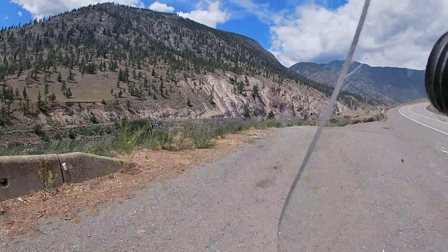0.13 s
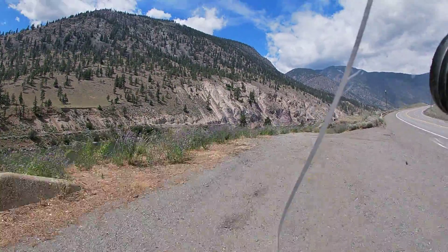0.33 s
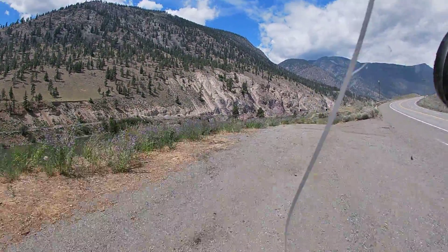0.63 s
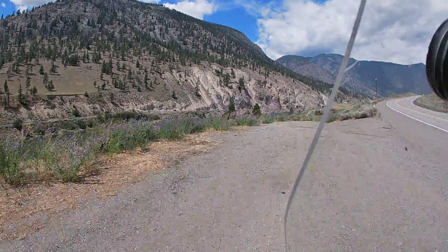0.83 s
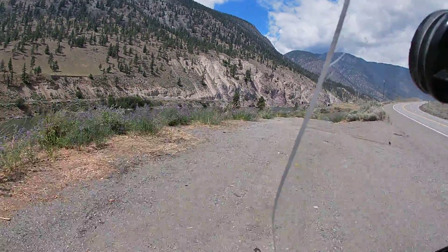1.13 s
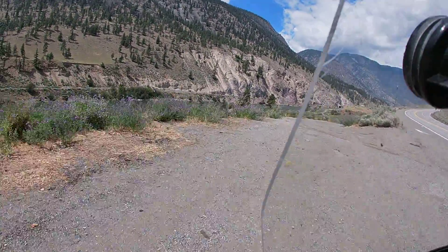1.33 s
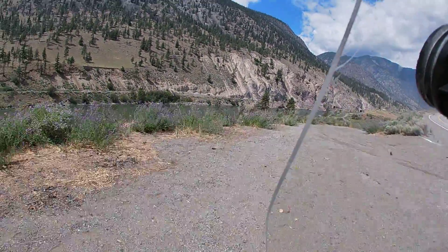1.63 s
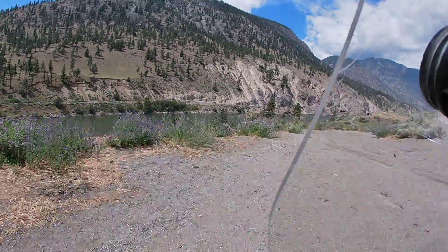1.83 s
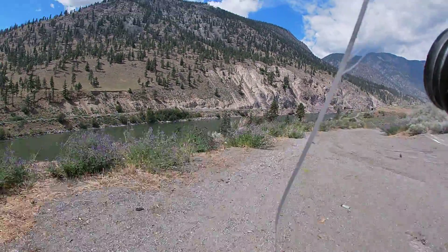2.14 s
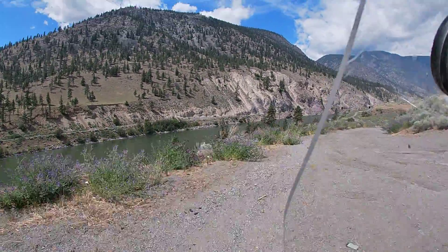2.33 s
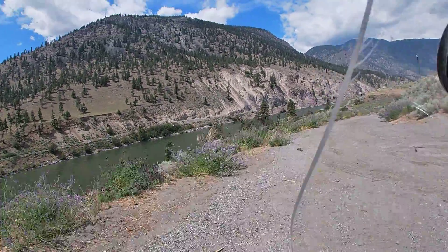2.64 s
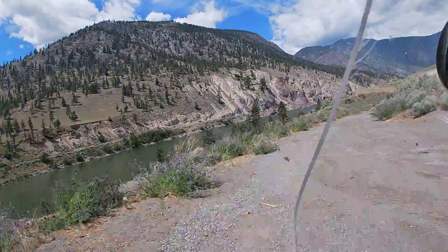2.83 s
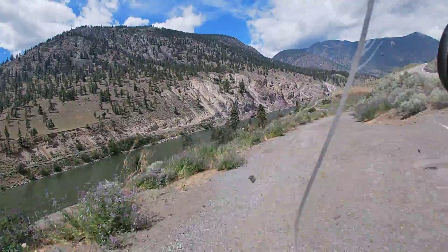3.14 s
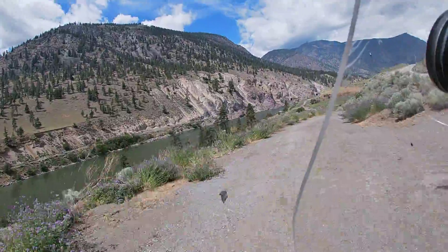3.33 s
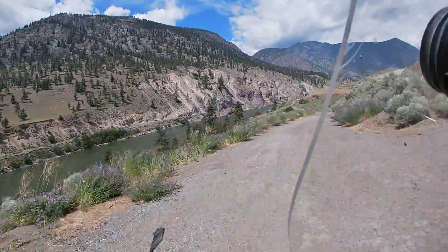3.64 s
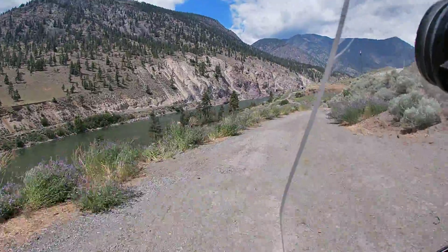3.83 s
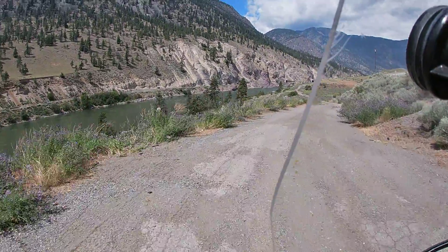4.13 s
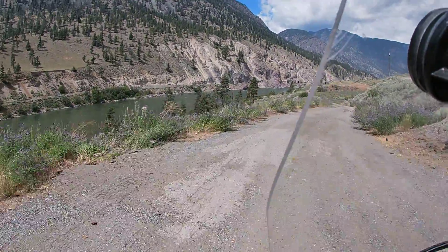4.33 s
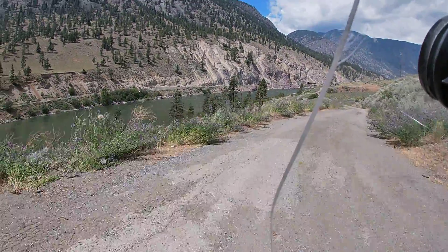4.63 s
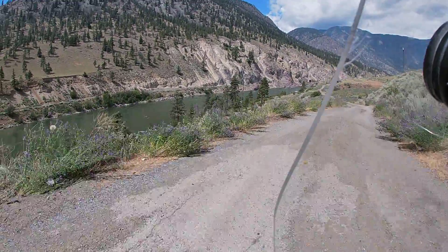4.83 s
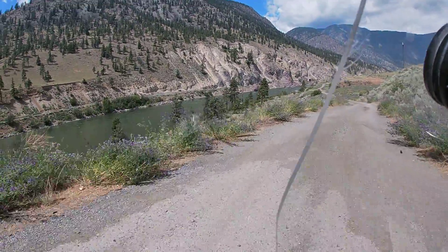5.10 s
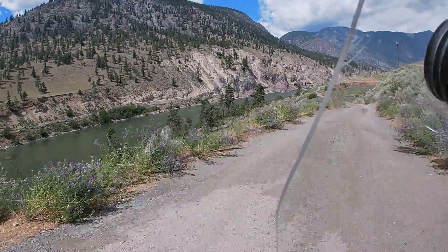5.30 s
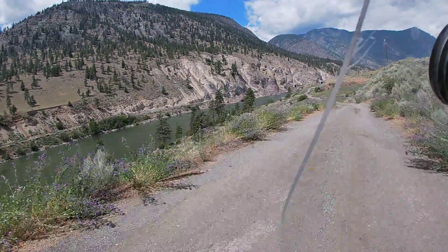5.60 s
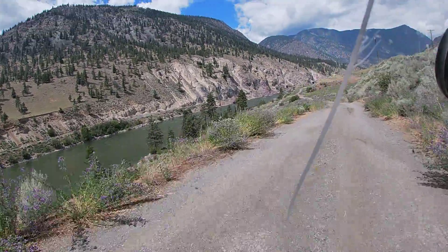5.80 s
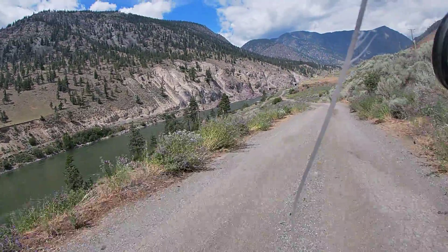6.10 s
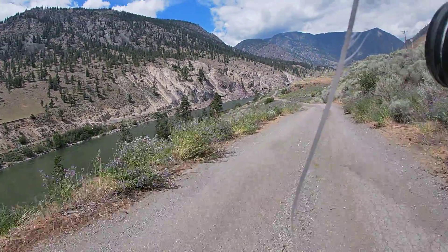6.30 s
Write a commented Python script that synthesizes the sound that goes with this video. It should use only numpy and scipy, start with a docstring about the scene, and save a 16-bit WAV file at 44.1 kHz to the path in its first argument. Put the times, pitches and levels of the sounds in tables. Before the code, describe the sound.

A camera behind a motorcycle windscreen hears a slow ride along an outdoor gravel track, about 6.5 seconds. At 0 s the exhaust is faint under low wind buffeting, with dense rattling ticks and several stone pings. From 0.25 to 1.1 s brief low thumps of wind hit the microphone while the exhaust swells into a deep, lumpy twin-cylinder putter, about twelve pairs of uneven puffs a second. It then holds at nearly steady speed, slowing slightly mid-way and quickening a little after 4.8 s. A loose part ticks irregularly throughout, dry and hard, each blow with a dull echo. Stones crack and ping, clustered before 0.6 s and around 2.3-2.6 s, with a sharp one near 3.85 s; few follow 4.7 s. Pulsing, gritty tyre roar and deep rumble continue underneath. After 4.8 s firings stumble more; the exhaust's upper tones rise as it drops at the very end.

```python
"""A twin-cylinder motorcycle rolls slowly down a gravel track, heard by a camera behind its windscreen.
At first the exhaust is faint: uneven puffs ring its modes. Wind noise and single eddies beat on the microphone.
The exhaust note swells over the first second, while its rasp changes much less.
A loose part ticks throughout, each blow with a dull echo. Stones crack and ping, mostly before 4.7 s.
Tyre roar, gritty crackle and deep rumble run underneath. Late firings grow more uneven, and the exhaust's
upper modes rise as its overall level falls at the very end."""
import sys
import numpy as np
from scipy import signal
from scipy.fft import rfft, irfft, next_fast_len
from scipy.io import wavfile
from scipy.ndimage import uniform_filter1d, minimum_filter1d

SR = 44100
rng = np.random.default_rng(int(sys.argv[2]) if len(sys.argv) > 2 else 0)


def store_pcm(level_fs):
    """Save levels as 16-bit WAV."""
    pcm = np.round(np.clip(level_fs, -1, 1) * 32767).astype(np.int16)
    wavfile.write(sys.argv[1], SR, np.atleast_2d(pcm).T)


N = 284886

# Engine speed. Each row: time in seconds, engine cycles per second (one cycle is two turns of the crank).
ENGINE_SPEED = [(0.0, 11.623), (0.17, 11.067), (0.34, 13.587), (0.51, 12.446), (0.68, 12.447),
                (0.85, 12.515), (1.02, 12.453), (1.19, 11.769), (1.36, 12.205), (1.53, 11.885),
                (1.7, 12.018), (1.87, 12.002), (2.04, 11.683), (2.21, 12.011), (2.38, 11.957),
                (2.55, 10.71), (2.72, 11.097), (2.89, 11.958), (3.06, 11.857), (3.23, 11.127), (3.4, 11.47),
                (3.57, 11.4), (3.74, 11.928), (3.91, 11.875), (4.08, 11.653), (4.25, 12.154),
                (4.42, 12.225), (4.59, 11.708), (4.76, 11.976), (4.93, 12.67), (5.1, 12.057),
                (5.27, 12.566), (5.44, 12.628), (5.61, 12.153), (5.78, 12.92), (5.95, 12.467),
                (6.12, 12.898), (6.29, 12.78), (6.46, 12.793)]


def engine_cycles():
    """Adding up the speed counts the engine cycles passed so far."""
    return np.cumsum(curve(ENGINE_SPEED)) / SR


def puff(cycle, at, width):
    """A bell-shaped pulse once a cycle; at and width (standard deviation) are shares of a cycle."""
    distance = (cycle - at + .5) % 1 - .5
    return np.exp(-.5 * (distance / width) ** 2)


# The two firings fall about half a turn apart (shares of a cycle).
FIRST_AT, SECOND_AT, PUFF_WIDTH = .027, .273, 0.01
SECOND_DB, LEAN_WANDER_DB = -1.5, 0.7  # second cylinder against first, and the spread of its drift
UPPER_FROM_HZ = 120
# Ways the exhaust rings. Each row: pitch in Hz, relative level in dB, time to fall by 60 dB in seconds.
EXHAUST_MODES = [(53, -1.5, 0.17), (61.7, -2, 0.0057), (131.7, 3.5, 0.067), (107.06, 7.5, 0.17),
                 (197, -20, 0.09)]
# Weak or strong firings. Each row: time in seconds, change of first cylinder in dB, of second in dB.
UNEVEN_FIRINGS = [(0.17, -3.5, 1.5), (0.33, 0.5, -13), (2.48, -3.5, 1.5), (2.57, -0.3, 0.7),
                  (2.66, -0.8, -0.7), (3.18, -4, 0), (3.27, 0.5, 0.5), (3.37, -1, 2), (3.46, -1, 2.5),
                  (3.63, -1, -1.3), (4.8, 0.1, 1), (4.87, 3, -13), (4.95, -21, 5), (5.12, 2, -9.5),
                  (5.2, -1.5, 0.5), (5.36, -2.5, -6.5), (5.44, -5, -1), (5.53, 1.5, -4.5), (5.61, 1.1, 3),
                  (5.69, 0, -2), (5.77, 0.5, 0), (5.85, 0.3, -2.1), (5.92, 2.5, -10), (5.99, -2.5, 0.5),
                  (6.07, -6, -0.5), (6.15, -5, -4.5), (6.24, -2, -4.5), (6.32, 0, 0.1), (6.4, -3.5, -2)]
# Level of the upper exhaust modes against the rest. Each row: time in seconds, change in dB.
UPPER_LEVEL = [(0, -1), (1, 2), (2.5, 1), (4, 0.5), (5, 2), (5.6, 2.5), (6, 2.5), (6.46, 7.5)]


def exhaust(cycle):
    """Puffs from both cylinders, each a little different, ring the exhaust modes."""
    lean_db = SECOND_DB + LEAN_WANDER_DB * walk(6.6)
    turn = (cycle + .5).astype(int)  # which engine cycle each sample belongs to
    s, *change_db = np.transpose(UNEVEN_FIRINGS)
    size_db = 0.74 * rng.standard_normal((N // 1000, 2))
    size_db[turn[(s * SR).astype(int)]] += np.transpose(change_db)
    size = undb(size_db)[turn]
    first = undb(-lean_db / 2) * size[:, 0] * puff(cycle, FIRST_AT, PUFF_WIDTH)
    second = undb(lean_db / 2) * size[:, 1] * puff(cycle, SECOND_AT, PUFF_WIDTH)
    upper_db = curve(UPPER_LEVEL)
    note = np.zeros(N)
    for k, (hz, db, t60) in enumerate(EXHAUST_MODES):
        mode_db = db + (hz > UPPER_FROM_HZ) * upper_db
        note += (-1) ** (k + 1) * undb(mode_db) * ring(first + second, hz, t60)  # neighbours oppose
    return level(note, 0.75)


# Bursts of gas and valve noise. Each row: share of a cycle, width as a share, relative level in dB.
GAS_BURSTS = [(.06, 0.015, 3.5), (.125, .02, -2), (.28, 0.02, -1.5), (.44, 0.059, -2.5)]
# Upper engine modes. Each row: pitch in Hz, relative level in dB, time to fall by 60 dB in seconds.
BARK_MODES = [(306, -4, 0.017), (451.5, -2.5, 0.038), (998.6, -5.5, 0.087), (1130, -2, 0.018),
              (1630, -4, 0.008)]
# Level of this rasp before the firing strength is applied. Each row: time in seconds, level in dB.
BARK_LEVEL = [(0, -15), (.25, -20), (.4, -24.5), (.6, -24.5), (1.1, -27), (1.6, -28), (2.5, -28),
              (3.5, -27), (4.5, -28.5), (5.5, -29), (6.46, -31)]


def bark(cycle):
    """Short noisy bursts at fixed crank angles ring the engine's upper modes."""
    bursts = sum(undb(db) * puff(cycle, at, width) for at, width, db in GAS_BURSTS)
    gas = bursts * rng.standard_normal(N) * undb(1.2 * walk(25))
    rasp = sum((-1) ** k * undb(db) * ring(gas, hz, t60) for k, (hz, db, t60) in enumerate(BARK_MODES))
    return level(rasp, curve(BARK_LEVEL))


# Strength of the firings. Each row: time in seconds, gain in dB.
FIRING_STRENGTH = [(0, -35), (.22, -28), (.34, -24), (.55, -23.5), (.7, -19.5), (1.3, -20), (2.35, -18.5),
                   (2.55, -21.5), (2.7, -18.5), (3.0, -17.5), (3.15, -15.5), (3.3, -20.5), (3.52, -17.5),
                   (3.65, -19), (3.8, -19), (4.45, -16.5), (4.7, -20), (4.92, -22.5), (5.25, -20.5),
                   (5.42, -18), (5.62, -17.5), (5.95, -19.5), (6.25, -16.5), (6.46, -26)]


def engine(cycle):
    """The firing strength sets the gain of both exhaust note and rasp."""
    return undb(curve(FIRING_STRENGTH)) * (exhaust(cycle) + bark(cycle))


FAINT_COUNT, FAINT_DB, FAINT_SPREAD_DB = 34, -32.5, 1.5
# Ticks of the loose part, loud and faint, at given times.
# Each row: time in seconds, blow strength in dB, extra low knock in dB.
TIMED_TICKS = [(0.037, -17, 8), (0.0709, -18.5, 5), (0.092, -22, 11), (0.11, -14, 3), (0.129, -28, 15),
               (0.154, -14.5, 2), (0.178, -25, 14.5), (0.2035, -20, 7), (0.243, -23.5, 6),
               (0.2882, -13.5, 2), (0.3277, -20.5, 6), (0.361, -28.5, -10), (0.438, -24.5, 7),
               (0.481, -25.5, -18), (0.576, -15, 9), (0.5797, -23, 7), (0.6569, -19, 4), (0.7128, -20, 4.5),
               (0.753, -20, -20), (0.867, -18.5, 6.5), (0.9195, -19, 4), (0.9454, -21.5, 5),
               (1.0092, -30.5, 12.5), (1.037, -16, 4.5), (1.082, -21.5, -6), (1.1134, -31.5, 13),
               (1.173, -25.5, 0), (1.1982, -23, 6), (1.2425, -20, 3), (1.285, -23, 9), (1.355, -28, -10),
               (1.421, -30, 9), (1.453, -25, 8), (1.505, -18.5, 5), (1.545, -27, 9), (1.5918, -13, 3),
               (1.6405, -17, 4), (1.677, -20, 5), (1.7291, -23, 7), (1.758, -34, 12), (1.794, -22, -1),
               (1.879, -32, -12), (1.918, -28, 7), (1.944, -33, -2), (1.992, -23, -15), (2.0779, -9.5, 2.5),
               (2.1185, -21, 7.5), (2.1625, -14.5, 0.5), (2.202, -20, 5.5), (2.232, -26.5, 7.5),
               (2.327, -17.5, 5.5), (2.3476, -22, 8), (2.382, -23, -0.5), (2.461, -14.5, 4),
               (2.4989, -12.5, 2.5), (2.537, -18.5, 6.5), (2.6226, -13, 1), (2.642, -26, -1),
               (2.675, -18.5, 3), (2.76, -34.5, 8), (2.827, -27, 4), (2.927, -31.5, 14), (3.067, -24.5, 4),
               (3.09, -20.5, 6.5), (3.146, -38, 4), (3.258, -14.5, 3.5), (3.295, -17.5, 2.5),
               (3.3361, -13, 3), (3.382, -27.5, 4), (3.4207, -16.5, 6), (3.59, -33, -4), (3.6097, -22.5, 4),
               (3.641, -22, 7), (3.674, -22.5, 2), (3.8529, -18, 1.5), (3.907, -15.5, 1.5),
               (3.9548, -15.5, 2.5), (4.002, -17, 3), (4.0884, -27, -11), (4.129, -24, -1.5),
               (4.156, -26, -2), (4.273, -25, 2), (4.379, -27, -4), (4.4851, -19, 2.5), (4.516, -21, 3),
               (4.562, -12.5, 2), (4.603, -17.5, 1.5), (4.652, -14.5, 3), (4.795, -19.5, 4),
               (4.925, -27.5, 9), (5.013, -15.5, 4.5), (5.071, -22.5, -1), (5.0972, -14, 3),
               (5.123, -14.5, 3), (5.2023, -21.5, 1), (5.315, -28.5, 8), (5.366, -17.5, 0),
               (5.4478, -20, 6), (5.5211, -31, 13), (5.59, -28, 9), (5.6209, -17.5, 5.5), (5.675, -21.5, 6),
               (5.88, -22.5, -0.5), (6.052, -20.5, 4), (6.114, -20, 5), (6.292, -30.5, 5), (6.317, -25, 7),
               (6.379, -24.5, -16)]


def all_blows():
    """The timed ticks, plus faint ones at chance moments, as three rows: time, strength, knock."""
    at = rng.random(FAINT_COUNT) * N / SR
    chance = rng.standard_normal((FAINT_COUNT, 2))
    faint = [at, FAINT_DB + FAINT_SPREAD_DB * chance[:, 0], 2 * FAINT_SPREAD_DB * chance[:, 1]]
    return np.hstack([np.transpose(TIMED_TICKS), faint])


KNOCK_TOP_HZ, SNAP_FROM_HZ = 2500, 7200  # modes below are the knock, modes above are the snap
HARD_DB, BRIGHTEN = -8.5, 0.55  # a harder blow is brighter: snap gains 0.55 dB extra per dB of strength
KNOCK_LEAD_S = 0.00054  # the knock comes through the frame ahead of the tick
CASE_HZ = 6900  # the camera case lets little of the body through above this
NOTCH_HZ, NOTCH_Q = 5280, 9.1  # a dip in what the case lets through
ECHO_S, ECHO_DB, ECHO_TOP_HZ = .0125, -9, 2200
# Ways the loose part rings. Each row: pitch in Hz, relative level in dB, time to fall by 60 dB in seconds.
LOOSE_MODES = [(850, 4, 0.0017), (1136, -2, 0.0068), (1690, -12, 0.0051), (2500, -12, 0.0036),
               (3284, -7, 0.0058), (3570, -3, 0.0077), (3717, -13, 0.014), (4280, -9, 0.0056),
               (4970, -13.5, 0.013), (5620, -15, 0.016), (6100, -17, 0.01), (6660, -27.5, 0.012),
               (7160, -35.5, 0.0084), (8150, -35, 0.0042), (9000, -36.5, 0.013), (9700, -43.5, 0.0051),
               (10900, -43, 0.004)]


def ticks():
    """Each blow rings the modes of the loose part, with its own amount of knock and a dull echo."""
    s, strength_db, knock_db = all_blows()
    at, contact = strike(s, sharp=26.0, scratch_s=0.002)
    body, snap = np.zeros(N), np.zeros(N)
    for k, (hz, db, t60) in enumerate(LOOSE_MODES):
        start, extra_db, part = at, 0, body
        if hz < KNOCK_TOP_HZ:
            start, extra_db = at - int(KNOCK_LEAD_S * SR), knock_db
        elif hz > SNAP_FROM_HZ:
            extra_db, part = BRIGHTEN * (strength_db - HARD_DB), snap
        scatter_db = 1.1 * rng.standard_normal(len(s))
        gain = undb(strength_db + extra_db + db + scatter_db)
        part += (-1) ** k * ring(add(start, contact * gain[:, None]), hz, t60)
    body = signal.lfilter(*signal.iirnotch(NOTCH_HZ, NOTCH_Q, SR), body)
    body = butter(body, 8, CASE_HZ)
    late = np.pad(body, (int(ECHO_S * SR), 0))[:N]
    echo = undb(ECHO_DB) * butter(late, 2, ECHO_TOP_HZ)
    return body + echo + butter(snap, 4, SNAP_FROM_HZ, "high")


PING_T60_S, PING_TOP_HZ = 0.0064, 6000
# Stones flung against the machine. Each row: time in seconds, peak of the bright crack in dB,
# pitch of the ping in Hz, peak of the ping in dB.
STONES = [(0.0313, -47, 2400, -23.5), (0.038, -53, 2320, -26), (0.071, -37, 3000, -36),
          (0.0927, -50, 3110, -35), (0.13, -49, 3060, -32), (0.1775, -58, 2640, -48),
          (0.2113, -65, 3020, -24), (0.4813, -52, 2300, -33), (0.5762, -35, 2680, -46),
          (0.58, -50, 2700, -28), (0.6, -58, 2280, -42), (0.867, -50, 3220, -49), (1.01, -54, 3030, -43),
          (1.174, -50, 3130, -35), (1.6217, -63, 3060, -35), (2.079, -39, 3200, -38),
          (2.2914, -51, 3070, -43), (2.3266, -44, 2280, -42), (2.358, -65, 3210, -30),
          (2.429, -60, 2300, -28), (2.506, -47, 3000, -33), (2.5222, -47, 2290, -28),
          (2.5581, -52, 2250, -46), (3.24, -57, 3150, -45), (3.8185, -51, 3270, -34),
          (3.8524, -34.5, 2930, -19), (4.063, -66, 2280, -35), (4.0883, -44.5, 2620, -25.5),
          (4.625, -50, 3070, -48), (5.9404, -72, 2260, -44)]


def stones():
    """A thin bright crack, and a short ping whose pitch depends on where the stone lands."""
    s, crack_db, ping_hz, ping_db = np.transpose(STONES)
    at, contact = strike(s, sharp=4.5, scratch_s=0.0019)
    crack = butter(contact, 3, (6800., 10400.), "band")
    ping = np.array([ring(c, hz, PING_T60_S) for c, hz in zip(contact, ping_hz)])
    ping = butter(ping, 4, PING_TOP_HZ)
    return add(at, peak(crack, crack_db) + peak(ping, ping_db))


def air_noise(spectrum, rate, patchy_db, db):
    """Noise of random, drifting strength is coloured like moving air on the microphone."""
    patchy = rng.standard_normal(N) * undb(patchy_db * walk(rate))
    return level(colour(patchy, spectrum), db)


# Colour of the wind. Each row: frequency in Hz, relative level in dB per Hz.
WIND_SPECTRUM = [(12, -18), (22, -6), (32, 2.5), (45, -2), (75, -2), (110, -4), (140, -6.5), (160, -20.5),
                 (250, -46), (1500, -110)]
# Strength of the gusts. Each row: time in seconds, gain in dB.
GUST_LEVEL = [(0, -23), (.2, -24.5), (.45, -26.5), (.7, -23.5), (1.0, -31), (1.22, -25.5), (1.4, -34.5),
              (1.65, -44), (1.88, -26.5), (2.2, -38), (2.499, -34), (2.851, -37.5), (3.05, -30), (3.5, -36),
              (3.75, -33.5), (4.4, -37.5), (4.8, -34), (5.0, -37), (5.32, -27.5), (5.45, -31), (5.72, -29),
              (6.2, -31.5), (6.46, -28)]


def wind():
    """Eddies off the windscreen beat on the microphone as low noise."""
    return undb(curve(GUST_LEVEL)) * air_noise(WIND_SPECTRUM, 9.3, patchy_db=1.0, db=5.5)


# Colour of the wind's quick flutter. Each row: frequency in Hz, relative level in dB per Hz.
FLUTTER_SPECTRUM = [(110, -38.5), (170, 7.5), (240, 4.5), (320, -4.5), (450, -10.5), (700, -51),
                    (3000, -100)]
# Strength of the flutter. Each row: time in seconds, gain in dB.
FLUTTER_LEVEL = [(0, -37), (.12, -37.5), (.27, -38.5), (.32, -24.5), (.37, -47.5), (.5, -39.5),
                 (.74, -39.5), (.88, -34.5), (1.301, -43), (2.2, -42), (2.5, -37), (3.0, -43), (3.201, -41),
                 (4.4, -45), (5.0, -42), (5.599, -42.5), (6.46, -47)]


def flutter():
    """Wind noise of higher pitch, whose strength changes more quickly."""
    return undb(curve(FLUTTER_LEVEL)) * air_noise(FLUTTER_SPECTRUM, 24.996, patchy_db=2.5, db=3.0)


THUMP_S = 0.0025  # width (standard deviation) of the bell around each thump
# Single eddies on the microphone. Each row: time in seconds, peak in dB, pitch in Hz.
THUMPS = [(0.256, -26, 250), (.318, -24, 310), (.385, -22, 230), (0.581, -24, 222), (0.679, -37, 410),
          (0.783, -31, 258), (.82, -53, 283), (0.871, -23, 248), (.925, -30, 230), (0.991, -35, 270),
          (1.085, -21.5, 212)]


def thumps():
    """A brief low pressure wobble for each eddy."""
    s, db, hz = np.transpose(THUMPS)
    span = np.arange(-800, 800)
    t = span / SR
    wobble = np.cos(2 * np.pi * (hz[:, None] * t + rng.random((len(s), 1))))
    shape = np.exp(-.5 * (t / THUMP_S) ** 2) * wobble
    return add((s * SR).astype(int)[:, None] + span, peak(shape, db))


# Colour of the roar. Each row: frequency in Hz, relative level in dB per Hz.
ROAR_SPECTRUM = [(210, -8.5), (442, -2.5), (632, -8), (800, -5), (940, -6), (1040, -4), (1290, -6.5),
                 (1700, -8), (2140, -12.5), (2910, -14), (3300, -16), (3600, -13), (3880, -19.5),
                 (4600, -23), (5120, -22), (5500, -29), (6000, -30), (6800, -39.5), (8600, -44.5),
                 (11500, -53.5)]
# Strength of the tyre and engine roar. Each row: time in seconds, gain in dB.
ROAR_LEVEL = [(0, -39), (.25, -42), (.38, -43.5), (.6, -41), (1.5, -41), (2.3, -41), (3.3, -42), (3.8, -41),
              (4.698, -42.5), (5.5, -39.5), (6.0, -41.5), (6.46, -39.5)]


def roar(cycle):
    """Tyre and engine noise pulses with firings and valve strokes; crushed grit crackles inside it."""
    swell = 1 + 0.75 * puff(cycle, .09, 0.05) + .3 * puff(cycle, 0.29, 0.04)
    swell += 0.35 * puff(cycle, 0.46, 0.07) + .2 * puff(cycle, 0.95, 0.05)
    swell -= .15 * puff(cycle, .66, .04)
    hiss = swell * undb(0.9 * walk(30)) * rng.standard_normal(N)
    size_db = np.minimum(5.1 * rng.exponential(size=N), 16.0)
    crunched = rng.random(N) < 900 / SR  # about 900 grains a second
    grit = crunched * undb(size_db) * rng.choice([-1, 1], N)
    mix = level(hiss, 0) + level(grit, -3.5)
    return undb(curve(ROAR_LEVEL)) * level(colour(mix, ROAR_SPECTRUM), 2.32)


# Colour of the deep rumble. Each row: frequency in Hz, relative level in dB per Hz.
RUMBLE_SPECTRUM = [(10, -6.5), (30, -2), (40, -6.5), (60, -39.5), (300, -110)]


def rumble():
    """Very low noise, wavering at random around one overall level."""
    return air_noise(RUMBLE_SPECTRUM, 7.2, patchy_db=5.5, db=-31.5)


def undb(db):
    """Turn decibels into a plain factor."""
    return 10 ** (np.asarray(db) / 20)


def level(x, db):
    """Bring the average (RMS) of x to 1, then apply a gain in dB."""
    return x * undb(db) / np.sqrt(np.mean(x ** 2))


def peak(x, db):
    """Set the peak of each row."""
    return x / np.abs(x).max(axis=1, keepdims=True) * undb(db)[:, None]


def curve(table):
    """Join the points of a time table with straight lines, one value a sample."""
    s, values = np.transpose(table)
    return np.interp(np.arange(N) / SR, s, values)


def walk(rate):
    """Random levels held about 1 / rate seconds and smoothed twice; spread 1."""
    k = int(SR / rate)
    held = np.repeat(rng.standard_normal(N // k + 1), k)
    w = uniform_filter1d(uniform_filter1d(held, k), k)[:N]
    return w / w.std()


def butter(x, order, hz, kind="low"):
    """Keep only the low, high or middle band of x."""
    return signal.sosfilt(signal.butter(order, hz, kind, fs=SR, output="sos"), x)


def colour(x, spectrum):
    """Filter x by (Hz, dB) points; folding the cepstrum makes the response causal."""
    hz, db = np.transpose(spectrum)
    size = next_fast_len(N) // 2 * 2
    f = np.maximum(np.arange(size // 2 + 1) * SR / size, 1)
    gain = undb(np.interp(np.log(f), np.log(hz), db))
    cepstrum = irfft(np.log(gain), size)
    cepstrum[1:size // 2] *= 2
    cepstrum[size // 2 + 1:] = 0
    return irfft(rfft(x, size) * np.exp(rfft(cepstrum)), size)[:N]


def ring(x, hz, t60):
    """One decaying mode struck by x; it falls by 60 dB in t60 seconds."""
    pole = np.exp(2j * np.pi * hz / SR - np.log(1000) / (t60 * SR))
    return signal.lfilter([1], [1, -pole], x).imag


def strike(s, sharp, scratch_s):
    """A first contact of size sharp, then a scratch that dies away, at each time; energy 1."""
    span = np.arange(512)
    contact = np.exp(-span / SR / scratch_s) * rng.standard_normal((len(s), len(span)))
    contact[:, 0] = sharp
    energy = np.sum(contact ** 2, axis=1, keepdims=True)
    return (s * SR).astype(int)[:, None] + span, contact / np.sqrt(energy)


def add(at, x):
    """Lay short sounds on a silent track."""
    out = np.zeros(N + x.shape[1])
    np.add.at(out, at, x)
    return out[:N]


def scene():
    """Add the engine, loose part, stones, moving air and track noise."""
    cycle = engine_cycles()
    machine = engine(cycle) + ticks() + stones()
    air = wind() + flutter() + thumps()
    return (machine + air + roar(cycle) + rumble())[None]


BASS_HZ, TOP_HZ = 20, 11600
CEILING, HOLD_S = .42, .012


def record(dry):
    """The camera drops the deepest bass, a limiter turns down loud peaks, the top is cut."""
    thin = butter(dry, 2, BASS_HZ, "high")
    hold = int(HOLD_S * SR)
    wanted_gain = CEILING / np.maximum(np.abs(thin), CEILING)
    gain = uniform_filter1d(minimum_filter1d(wanted_gain, hold), hold)
    return signal.sosfilt(signal.ellip(8, .2, 70, TOP_HZ, fs=SR, output="sos"), gain * thin)


dry = scene()
out = record(dry)
store_pcm(out)
```